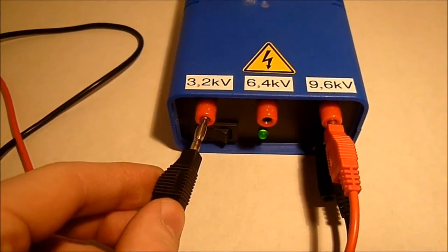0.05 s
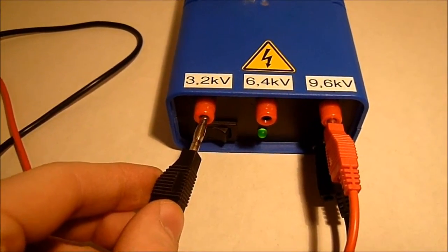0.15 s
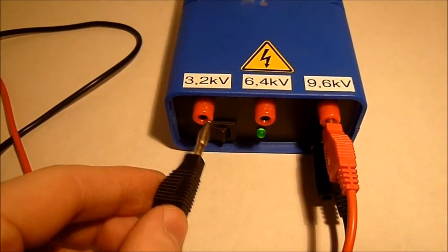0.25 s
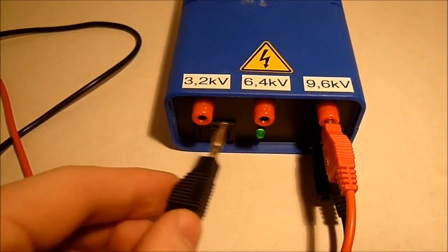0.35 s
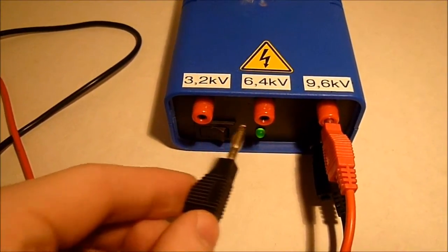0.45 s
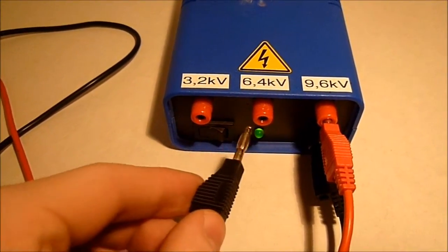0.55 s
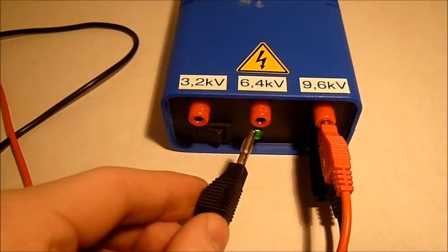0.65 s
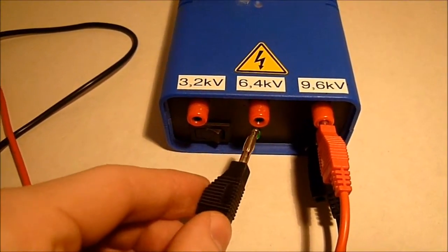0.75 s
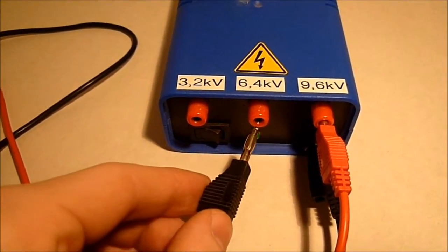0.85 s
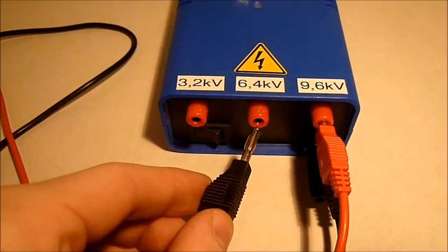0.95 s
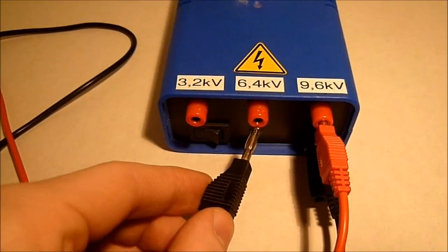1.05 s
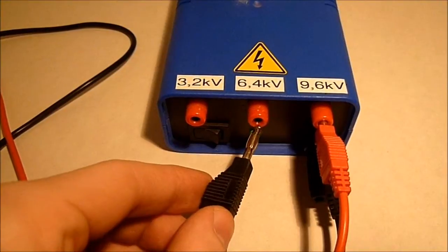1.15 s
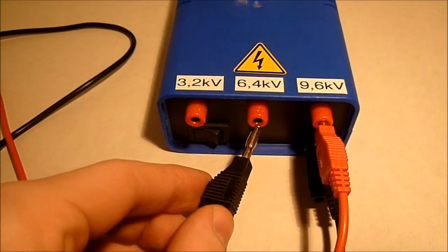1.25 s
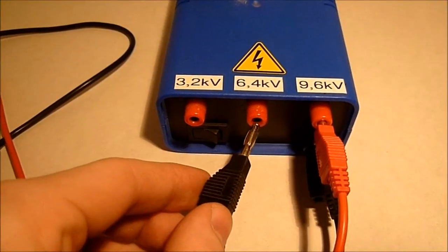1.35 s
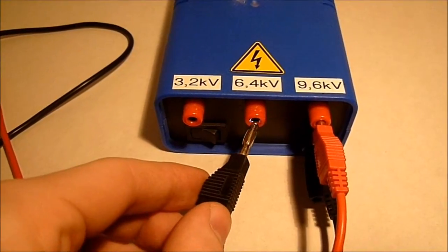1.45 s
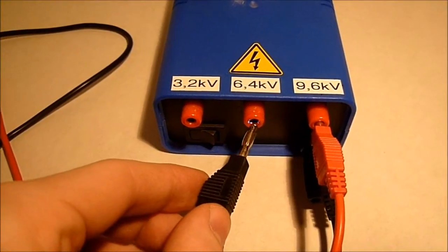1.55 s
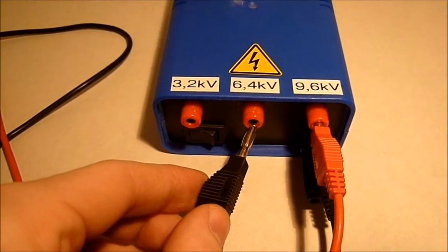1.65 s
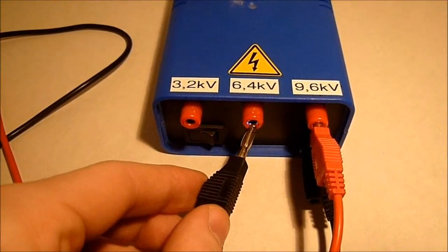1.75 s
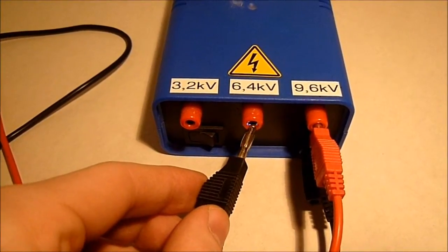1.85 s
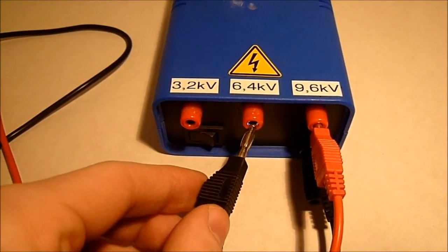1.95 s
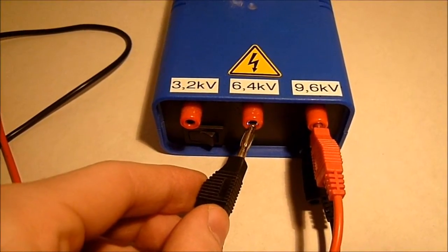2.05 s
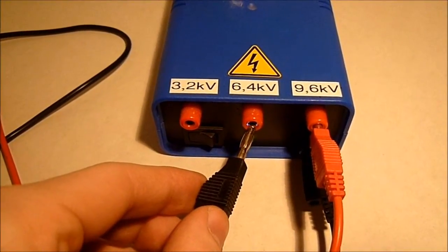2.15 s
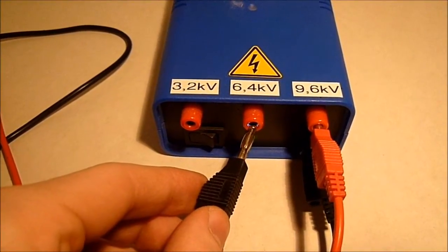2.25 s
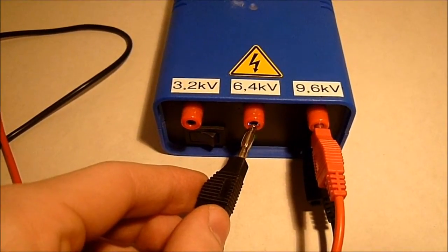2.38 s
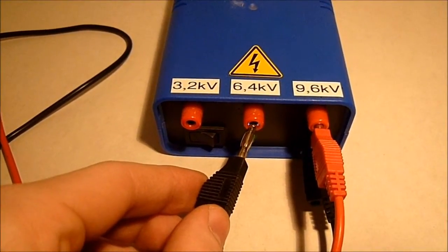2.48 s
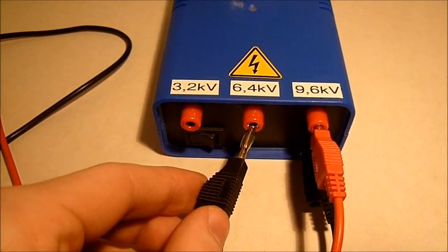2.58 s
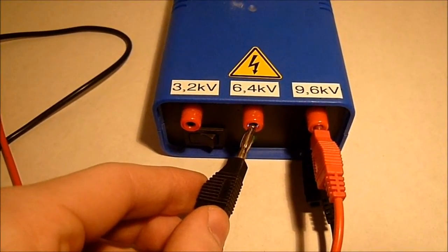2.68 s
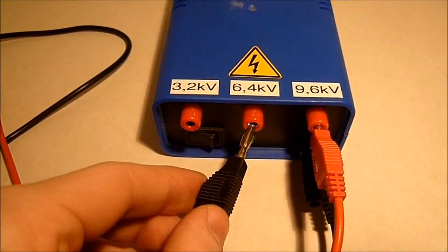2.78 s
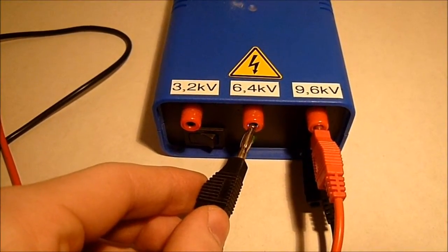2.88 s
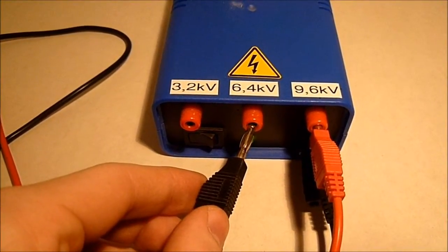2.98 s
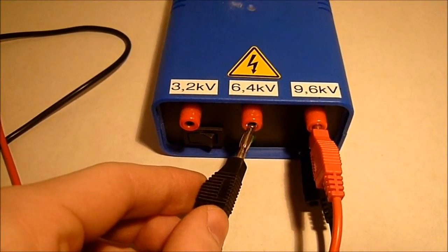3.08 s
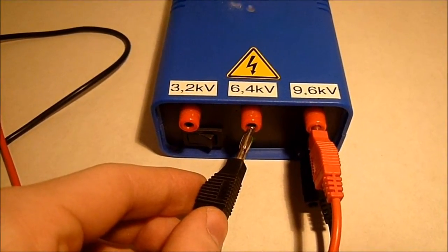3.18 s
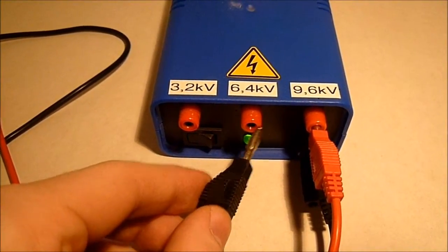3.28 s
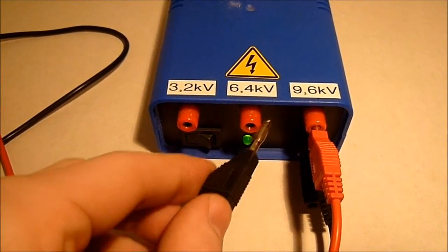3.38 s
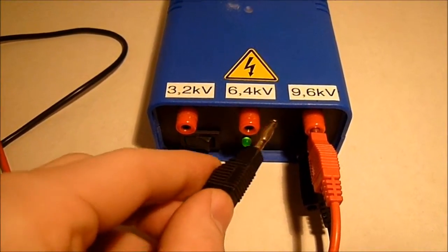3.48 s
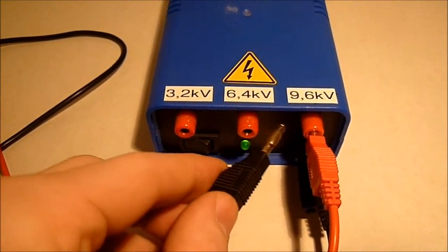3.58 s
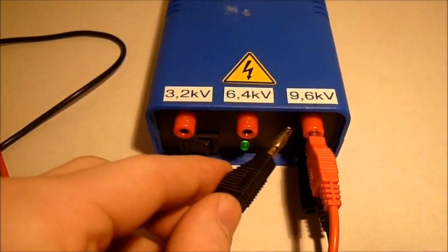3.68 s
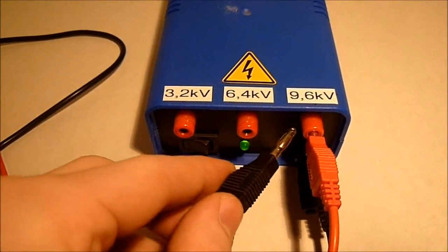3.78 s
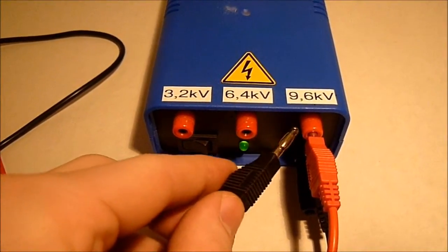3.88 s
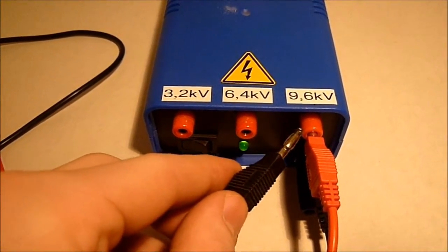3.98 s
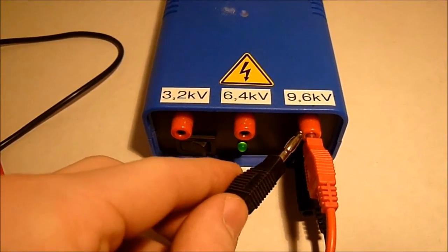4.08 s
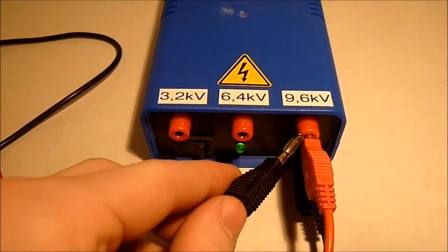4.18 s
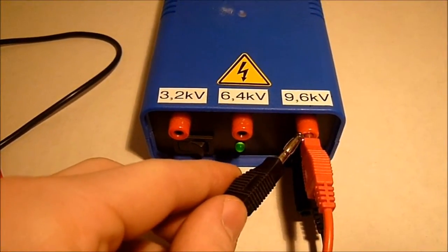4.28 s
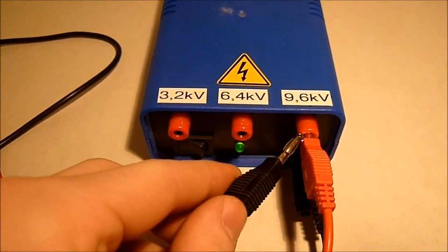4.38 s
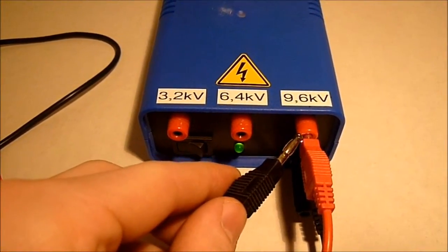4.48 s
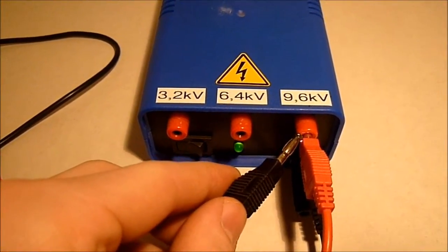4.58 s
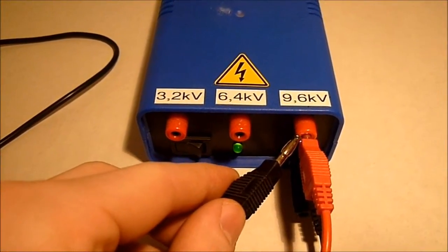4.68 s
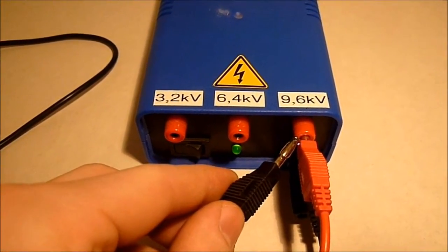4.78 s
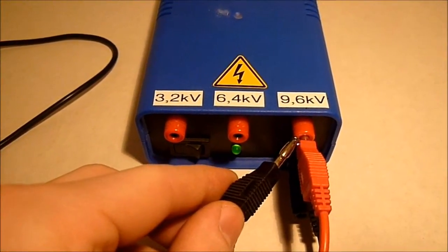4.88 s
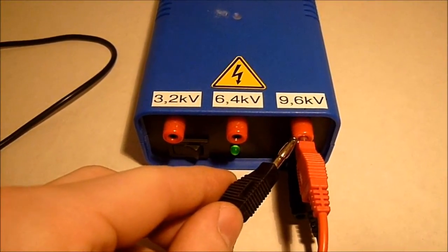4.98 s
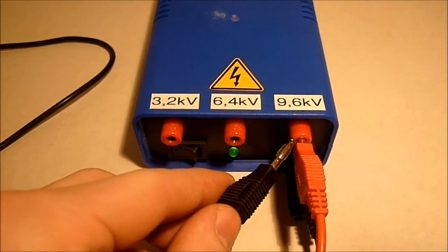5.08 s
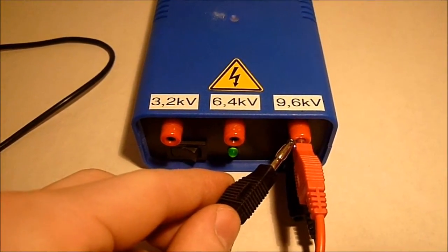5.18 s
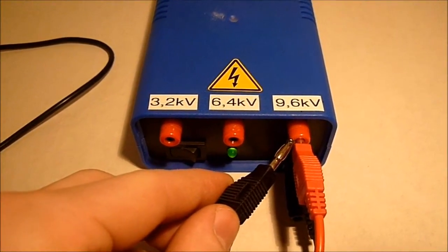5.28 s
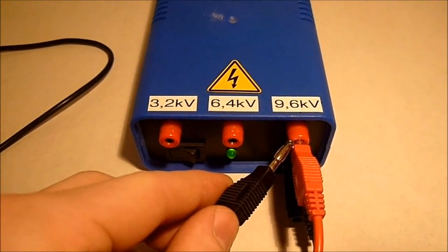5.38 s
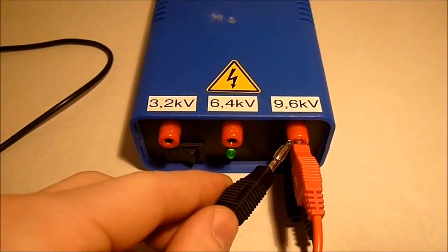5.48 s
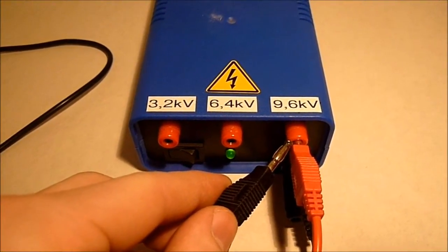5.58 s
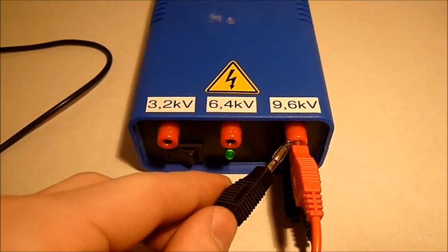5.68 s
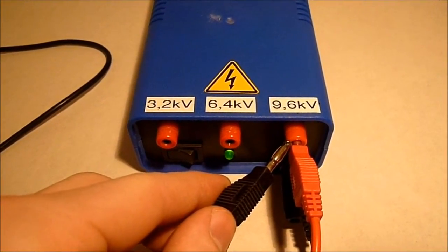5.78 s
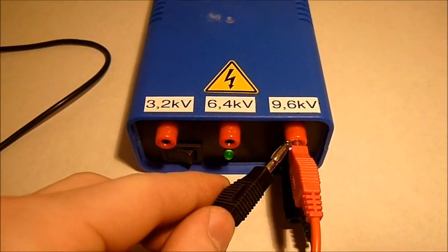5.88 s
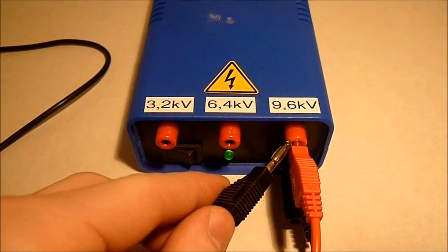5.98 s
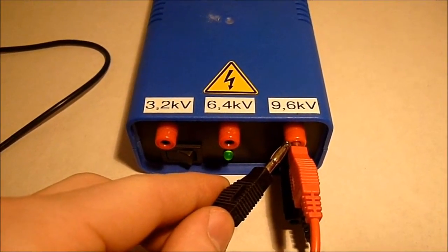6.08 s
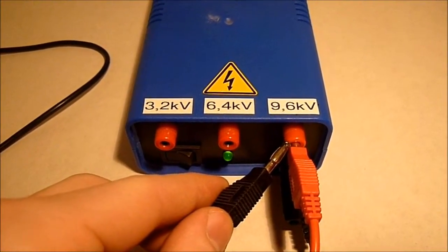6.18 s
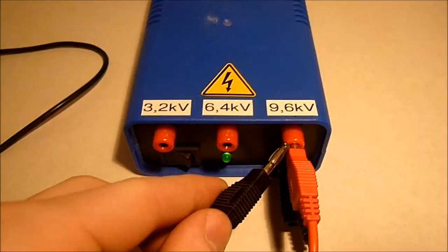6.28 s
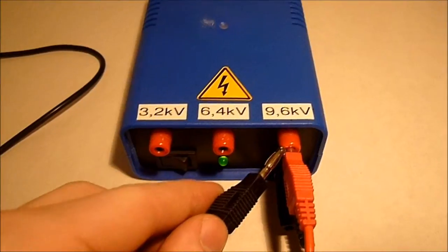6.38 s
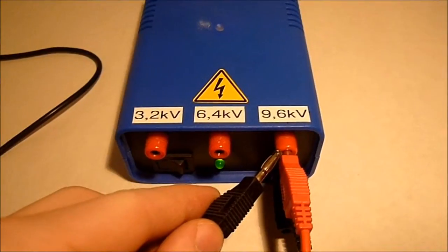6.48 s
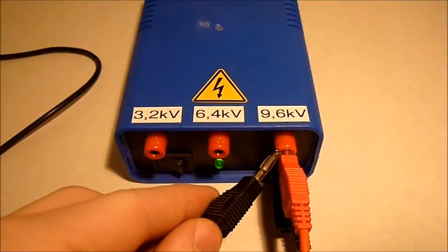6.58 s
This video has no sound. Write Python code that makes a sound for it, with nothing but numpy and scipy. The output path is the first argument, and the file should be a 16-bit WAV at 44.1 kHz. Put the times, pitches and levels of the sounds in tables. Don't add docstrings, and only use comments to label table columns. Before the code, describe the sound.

Electric sparks snap singly, then race into a harsh fast buzz; after a pause and a sharp click, louder dry snaps crackle unevenly onward.

```python
import sys
import numpy as np
from scipy import signal
from scipy.fft import rfft, irfft
from scipy.io import wavfile
from scipy.ndimage import uniform_filter1d

SR = 44100
rng = np.random.default_rng(int(sys.argv[2]) if len(sys.argv) > 2 else 0)


def wav_record(signal):
    frames = np.transpose(np.atleast_2d(signal))
    bounded = np.clip(frames, -1, 1)
    quanta = np.round(bounded * 32767).astype(np.int16)
    wavfile.write(sys.argv[1], SR, quanta)


def how_loud(loudness_db):
    steps = np.asarray(loudness_db, float) / 20
    return 10 ** steps


N = 293265

# (frequency [Hz], level [dB per Hz])
AIR_COLOUR = [(15, -24), (25, 2), (33, -24.5), (88, -9.5), (209, -5.5), (401, -9), (716, -8.5),
              (868, -14.5), (1220, -12.5), (1670, -20), (6920, -26), (8000, -24), (10400, -58.5),
              (17600, -120)]
# (frequency [Hz], width [Hz], level [dB per Hz])
HUM = (1214, 120, -17)
AIR_SHARE = 0.75
HISS_SHARE, HISS_HZ = .3, 1700
# (time [s], level [dB])
GAIN = [(0, 0), (1.375, 0.5), (1.41, -2), (1.54, -2.5), (1.705, 0), (1.73, -3), (1.85, -4.5), (3.1, -5),
        (4.11, -2), (4.18, -8), (4.27, -9.5), (4.47, -11), (4.59, -14), (5.0, -13), (6.65, -13)]
# (time [s], peak level [dB], frequency [Hz], time to fall 60 dB [s])
TAPS = [
    (.15, -41, 904, .03),
    (.755, -39, 154, 0.048),
    (2.739, -43, 112, 0.14),
    (2.748, -38, 202, 0.061),
    (3.65, -36.5, 260, 0.019),
    (3.661, -38.5, 454, 0.033),
    (4.045, -35, 1650, 0.036),
    (4.044, -38, 3470, .017),
    (5.721, -45, 79.4, 0.13),
]

SOCKET_SPARKS = [1.3678, 1.4193, 1.4412, 1.461, 1.4815, 1.5052, 1.5383, 1.7021, 1.7379, 2.9111, 2.9418,
                 2.9762, 3.0699]
# (first time [s], last time [s], number of sparks)
SOCKET_RUNS = [
    (1.7587, 1.8325, 6),
    (2.5286, 2.6352, 8),
    (2.649, 2.7251, 9),
    (2.7374, 2.7791, 4),
    (2.7967, 2.8829, 7),
]
# (time [s], rate [sparks per s])
BUZZ = [
    (1.836, 106),
    (2.001, 102.5),
    (2.171, 99.4),
    (2.268, 100),
    (2.379, 102),
    (2.448, 118),
    (2.519, 140),
]
# (time [s], peak level [dB])
FAINT_SPARK = [
    (3.515, -41),
]
# (time [s], level over what the charge gives [dB])
TERMINAL_SPARKS = [(4.1027, -0.5), (4.1857, 1.5), (4.229, 0.5), (4.5231, 0), (4.5526, 0.5), (4.9206, 1.5),
                   (4.9526, -1), (5.0371, -1), (5.1332, 0.3), (5.1564, 1), (5.1757, -2), (5.2048, -1),
                   (5.2385, -0.5), (5.3029, 0), (5.3483, 0), (5.3881, 0.5), (5.5814, 1.7), (5.6363, 3),
                   (5.697, -0.5), (5.7409, 2), (5.795, -1), (5.8666, 1.5), (5.9407, -0.5), (6.0384, -0.4),
                   (6.0946, 1.6), (6.3073, 2), (6.3707, 1)]
# (first time [s], last time [s], number of sparks)
TERMINAL_RUNS = [
    (4.2673, 4.4991, 8),
    (4.5874, 4.6276, 3),
    (4.6516, 4.6958, 3),
    (4.7199, 4.8913, 8),
]
BUZZ_JITTER, RUN_JITTER = .13, .07
STRAY_DB = .9
SOCKET_FULL_DB, SOCKET_CHARGE_S = -8, 0.016
TERMINAL_FULL_DB, TERMINAL_CHARGE_S = -0.14, 0.015

# (frequency [Hz], width [Hz])
BLAST = (2550, 3500)
# (frequency [Hz], width [Hz])
PUSH = (516, 543)
# (frequency [Hz], width [Hz], level [dB])
SOCKET_MODES = [(4649, 1226, 16.7), (4879, 2263, 13.3), (4124, 217, 20.5)]
DEEPER_S = 1.75
# (frequency [Hz], width [Hz], level [dB])
DEEP_MODES = [(4621, 824, 11.8), (6127, 2600, 5.1), (4106, 240, 21.3)]
# (start time [s], tuning
DEEP_STAGES = [
    (1.75, 1),
    (2.3, 1.),
    (2.7, 1),
]
# (frequency [Hz], width [Hz], level [dB])
TERMINAL_MODES = [(5960, 1924, 30.8), (5820, 2025, 30.8)]
# (delay [ms], level [dB])
SOCKET_ECHOES = [(0.85, -15.0), (1.08, -5.1), (1.55, -13.8), (1.78, -13.2), (2.39, -11.6), (2.78, -19.2),
                 (3.34, -16.8)]
TERMINAL_ECHOES = [(1.18, -5.0), (1.78, -11.6), (2.08, -15.6), (2.59, -17.2), (2.83, -14.4), (3.18, -18.4),
                   (3.78, -18.1)]
# (delay [ms], level [dB])
SOCKET_HAND = [(1.14, -23.0), (2.85, -16.2), (4.46, -21.2), (5.65, -25.6)]
DEEP_HAND = [(1.71, -15.0), (2.65, -16.0), (4.2, -26.4), (5.42, -24.2)]
TERMINAL_HAND = [(1.04, -17.8), (1.45, -14.0), (1.54, -12.6), (2.46, -23.2)]
# (delay [ms], level [dB])
SOCKET_WALLS = [(8.4, -18.5), (12.8, -29), (16.5, -55.5), (27, -36)]
TERMINAL_WALLS = [(7.3, -20.5), (9.9, -21.5), (16.4, -23), (17.3, -35)]
# (delay [ms], frequency [Hz], width [Hz], level [dB])
SOCKET_RING = [(1.5, 7680, 340, 0.5), (2.5, 2780, 180, -9.5)]
BOX_RING = [(8.6, 2700, 500, -12), (3.4, 5130, 250, -13), (2.23, 1280, 400, -7.5), (2.65, 3200, 170, -4),
            (2.5, 570, 59, -8.5), (3, 6900, 340, -4.5), (3, 7180, 230, -6.5)]
# (frequency [Hz], time to fall 60 dB [s])
ROOM_T60 = [(200, 0.79), (1000, 0.57), (4000, 0.28), (8000, 0.5)]
SOCKET_NOTE, NOTE_IN_ROOM = (4240, 130), 7

# (time [s], level [dB])
JOLT = [
    (1.36, -12),
    (1.502, -2.5),
    (4.1, 0.5),
    (4.2, 1.5),
    (4.45, -8),
    (4.6, -12),
]
EDGE_HZ, BIAS = 7625, 0.017


def evened(x):
    return x / np.sqrt(np.mean(x ** 2) + 1e-20)


def read(points, hz):
    f, value = np.transpose(points)
    return np.interp(np.log(hz + 1), np.log(f + 1), value)


def band(f, hz, width):
    return 1j * f * width / (hz ** 2 - f ** 2 + 1j * f * width)


def gain_db(s):
    return np.interp(s, *np.transpose(GAIN))


def air():
    frames = N // 256 + 5
    hz = np.fft.rfftfreq(1024, 1 / SR)[:, None]
    a, b, patches = rng.standard_normal((frames, 513, 3)).T
    patches = uniform_filter1d(patches, size=8, axis=0)
    patches = evened(uniform_filter1d(patches, size=10, axis=1))
    lift_db = AIR_SHARE * gain_db(np.arange(frames) * 256 / SR)
    hum = how_loud(HUM[2]) * abs(band(hz, *HUM[:2])) ** 2
    colour = how_loud(read(AIR_COLOUR, hz)) + hum
    drift_db = np.where(hz < HISS_HZ, lift_db + 0.88 * patches, HISS_SHARE * lift_db)
    spectrum = (a + 1j * b) * colour * how_loud(drift_db)
    noise = signal.istft(spectrum, nperseg=1024, noverlap=768)[1][:N]
    return how_loud(-54.5) * evened(noise)


def taps():
    out, t = np.zeros(N + 4000), np.arange(4000) / SR
    for s, db, hz, t60 in TAPS:
        out[round(s * SR):][:len(t)] += how_loud(db - 60 * t / t60) * np.sin(2 * np.pi * hz * t)
    return out[:N]


def delayed(f, ms):
    return np.exp(-2j * np.pi * f * ms / 1000)


def bounces(f, rows):
    return sum(how_loud(db) * delayed(f, ms) for ms, db in rows)


def scatter(t60, start_s, length):
    reflections = np.zeros(length)
    at = np.arange(0, length - 16, 16) + rng.integers(0, 16, (length - 1) // 16)
    reflections[at] = rng.choice([-1., 1.], len(at))
    hz, t, z = signal.stft(reflections, SR, nperseg=128)
    fade = how_loud(-60 * t / read(t60, hz)[:, None])
    tail = signal.istft(z * fade, SR, nperseg=128)[1][:length]
    tail *= np.clip(np.arange(length) / SR / start_s - 1, 0, 1)
    return tail / np.linalg.norm(tail)


def spark(modes, echoes, walls, ring_ms, clutter_db, room_db, ring_in_room, push_db, glint_hz, box=()):
    size = 1 << 15
    f = np.fft.rfftfreq(size, 1 / SR)
    signs = [1] + [-1] * (len(modes) - 1)
    hollow = sum(sign * how_loud(db) * band(f, hz, w) for sign, (hz, w, db) in zip(signs, modes))
    blast = -band(f, *BLAST)
    near = blast * (1 + delayed(f, ring_ms) * hollow)
    peak = abs(irfft(near * (f < EDGE_HZ))).max()

    glint = band(f, glint_hz, 1800)
    clutter = how_loud(clutter_db) * glint * rfft(scatter([(200, 0.27), (8000, 0.027)], 0.0006, 2000), size)
    room = how_loud(room_db) * rfft(scatter(ROOM_T60, 0.014, 24000), size)
    sideways = band(f, 3490, 3700) + ring_in_room * band(f, *SOCKET_NOTE)
    panels = sum(delayed(f, ms) * how_loud(db) * band(f, hz, w) for ms, hz, w, db in box)
    table_push = how_loud(push_db) * band(f, *PUSH)

    direct = near * (1 + bounces(f, walls)) + blast * bounces(f, echoes) - table_push
    return irfft(direct + clutter + panels + sideways * room)[:size // 2] / peak


def train(rows):
    s, db = np.transpose(rows)
    out = np.zeros(N)
    np.add.at(out, np.round(s * SR).astype(int), how_loud(db))
    return out


def charged(s, full_db, charge_s, stray_db):
    order = np.argsort(s)
    s = np.asarray(s)[order]
    fill = 1 - np.exp(-np.diff(s, prepend=0) / charge_s)
    level_db = full_db + 20 * np.log10(fill + 1e-3) + gain_db(s) + stray_db[order]
    return np.transpose([s, level_db])


def runs(table):
    out = []
    for first, last, count in table:
        steps = np.cumsum(np.r_[0, 1 + RUN_JITTER * rng.standard_normal(count - 1)])
        out += list(first + (last - first) * steps / steps[-1])
    return out


def buzz():
    s, rate = np.transpose(BUZZ)
    gaps = np.clip(1 + BUZZ_JITTER * rng.standard_normal(120), .6, 1.5)
    t = np.arange(s[0], s[-1], 1 / SR)
    sparks_so_far = np.cumsum(np.interp(t, s, rate)) / SR
    at = np.interp(np.cumsum(gaps), sparks_so_far, t, right=np.nan)
    return list(at[np.isfinite(at)])


def socket_sparks(stray_db):
    shallow = spark(SOCKET_MODES, SOCKET_ECHOES, SOCKET_HAND + SOCKET_WALLS, ring_ms=.1, clutter_db=0.0,
                    room_db=-13, ring_in_room=NOTE_IN_ROOM, push_db=-14, glint_hz=7200)
    deep = [spark(np.multiply(DEEP_MODES, (tune, 1, 1)), SOCKET_ECHOES, DEEP_HAND + SOCKET_WALLS,
                  ring_ms=.109, clutter_db=-2, room_db=-12, ring_in_room=NOTE_IN_ROOM, push_db=-20,
                  glint_hz=7400, box=SOCKET_RING) for s, tune in DEEP_STAGES]
    times = SOCKET_SPARKS + runs(SOCKET_RUNS) + buzz()
    clicks = train(charged(times, SOCKET_FULL_DB, SOCKET_CHARGE_S, stray_db))
    early = np.arange(N) < DEEPER_S * SR
    stage = np.searchsorted([s for s, tune in DEEP_STAGES[1:]], np.arange(N) / SR)
    out = how_loud(-0.05) * signal.oaconvolve(clicks * early, shallow)
    for k, one in enumerate(deep):
        out += how_loud(-1.44) * signal.oaconvolve(clicks * ~early * (stage == k), one)
    return out[:N]


def terminal_sparks(stray_db):
    terminal = spark(TERMINAL_MODES, TERMINAL_ECHOES, TERMINAL_HAND + TERMINAL_WALLS, ring_ms=.07,
                     clutter_db=-2, room_db=-9.5, ring_in_room=0, push_db=-10.5, glint_hz=6900, box=BOX_RING)
    held = runs(TERMINAL_RUNS)
    s, extra_db = np.transpose(TERMINAL_SPARKS)
    extra_db = np.r_[extra_db, stray_db[:len(held)]]
    snaps = train(charged(np.r_[s, held], TERMINAL_FULL_DB, TERMINAL_CHARGE_S, extra_db))
    return how_loud(0.87) * signal.oaconvolve(snaps + train(FAINT_SPARK), terminal)[:N]


def scene():
    terminal_stray_db, socket_stray_db = STRAY_DB * rng.standard_normal((2, 200))
    sparks = socket_sparks(.8 * socket_stray_db) + terminal_sparks(terminal_stray_db)
    return (air() + taps() + sparks)[None]


def low_pass(x):
    return signal.sosfilt(signal.butter(12, 8390, fs=SR, output="sos"), x)


def record(dry):
    sag, settle = np.exp(-1 / (.035 * SR)), np.exp(-1 / (.2 * SR))
    bite = abs(dry) ** 1.8
    push = bite * how_loud(np.interp(np.arange(N) / SR, *np.transpose(JOLT)))
    jolt = signal.lfilter([280 / SR], [1, -sag], push)
    jolt = signal.lfilter([1, -1], [1, -settle], jolt)
    squashed = 1.5 * np.tanh(dry / 1.5)
    lowpass = signal.firwin(101, EDGE_HZ, window=("kaiser", 7), fs=SR)
    limited = signal.oaconvolve(squashed + jolt, lowpass[None], "same")
    return low_pass(limited + BIAS)


dry = scene()
out = record(dry)
wav_record(out)
```